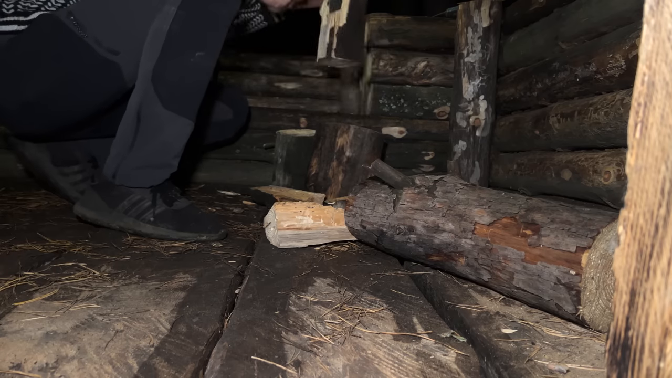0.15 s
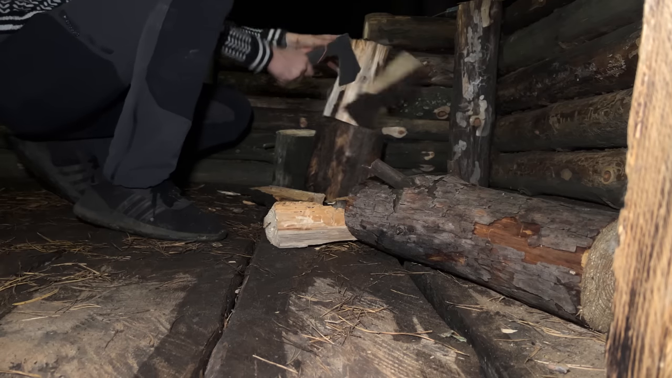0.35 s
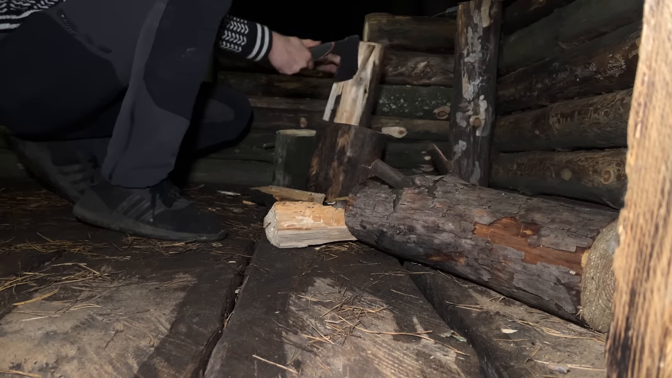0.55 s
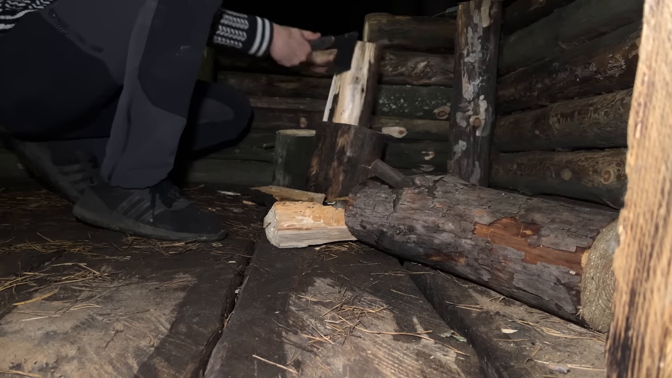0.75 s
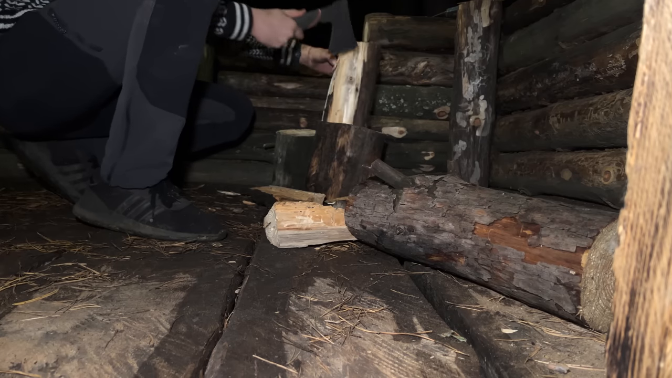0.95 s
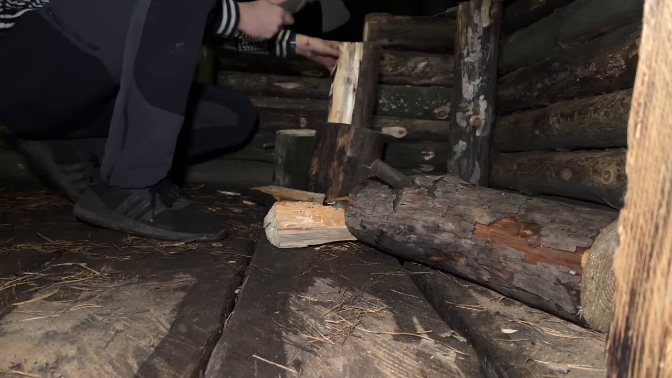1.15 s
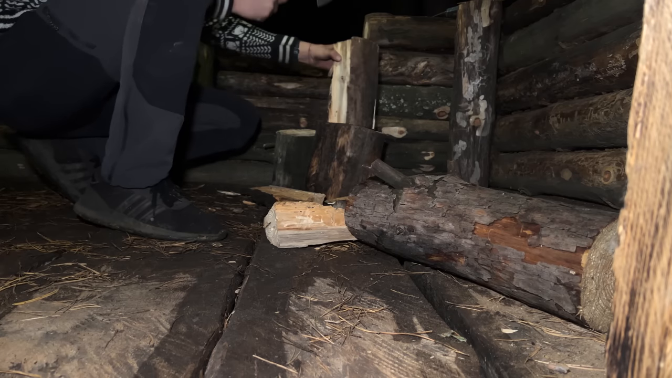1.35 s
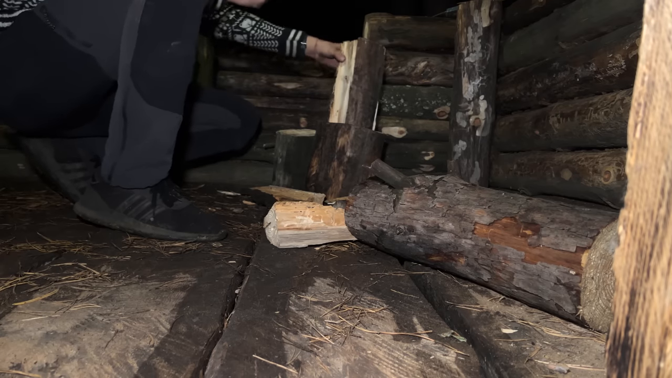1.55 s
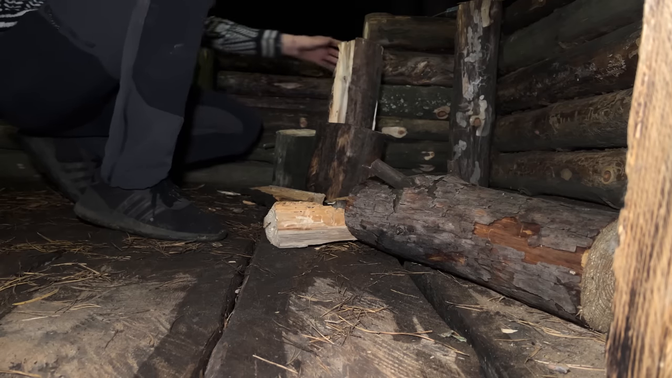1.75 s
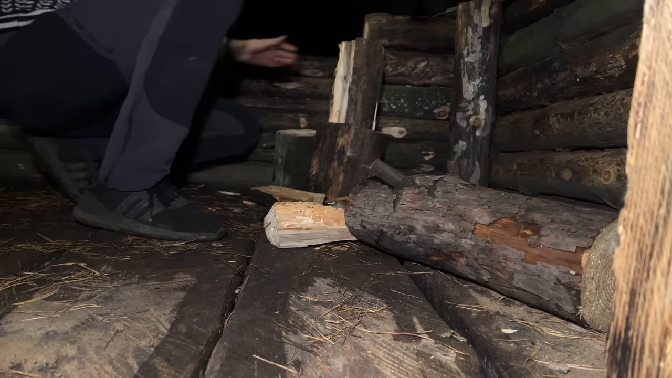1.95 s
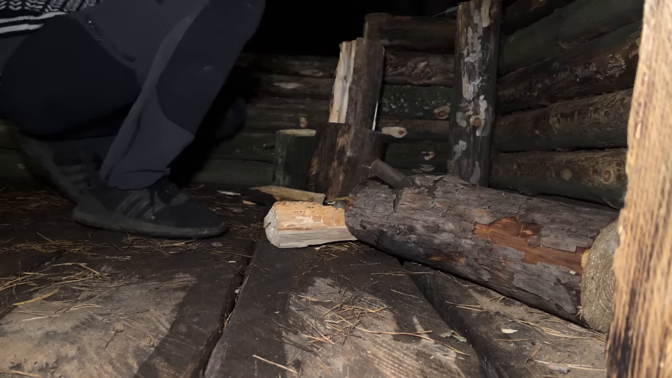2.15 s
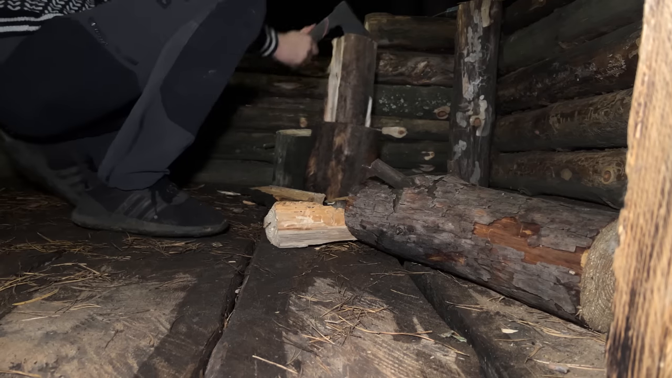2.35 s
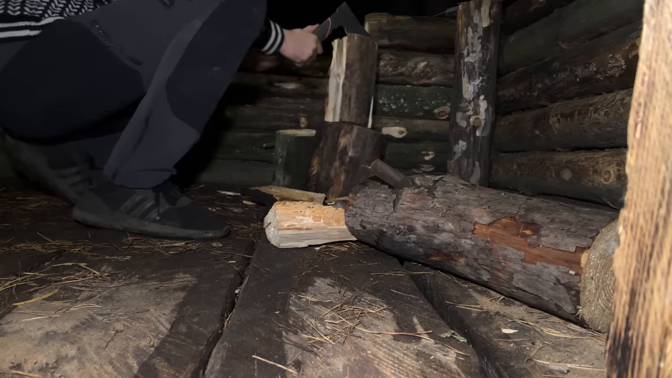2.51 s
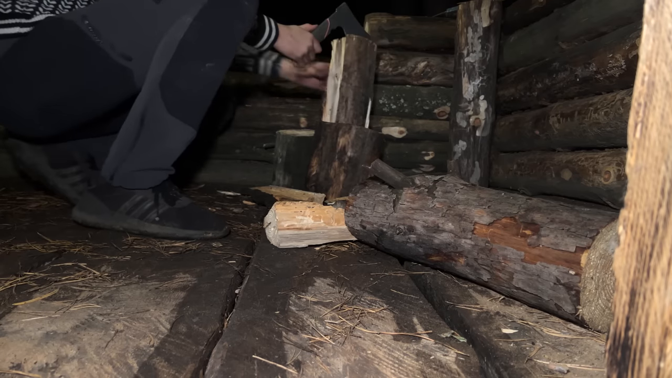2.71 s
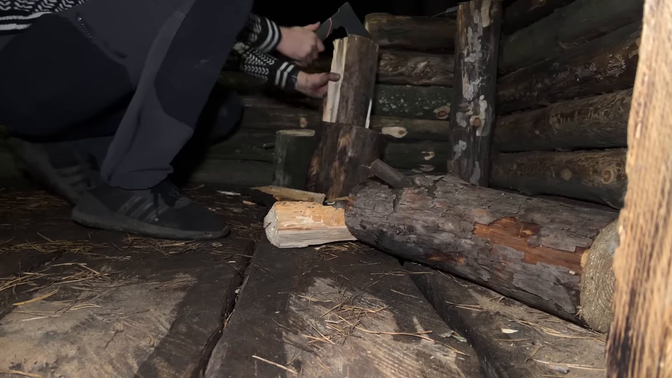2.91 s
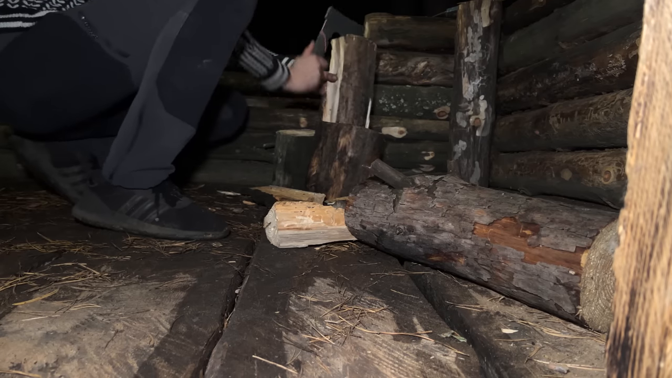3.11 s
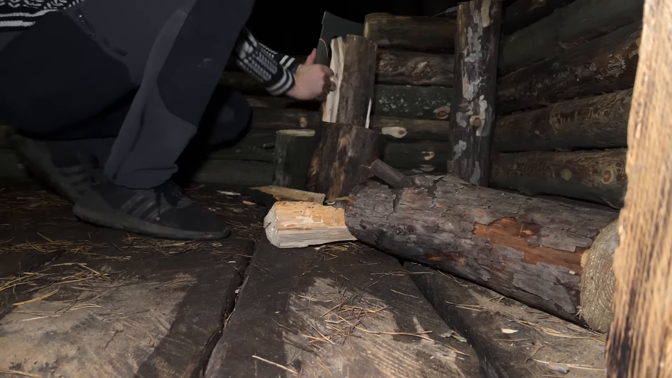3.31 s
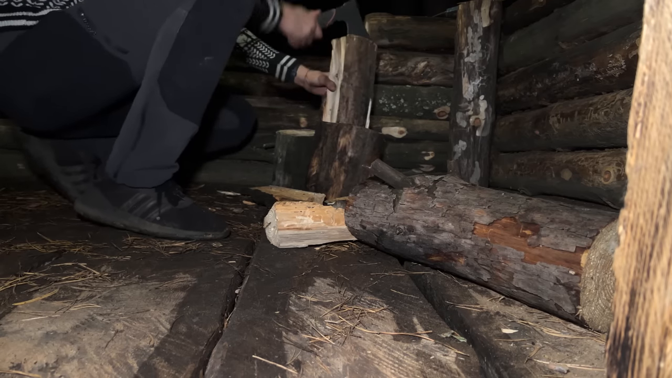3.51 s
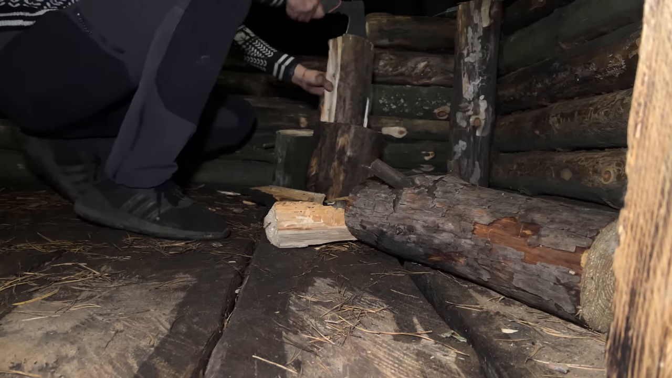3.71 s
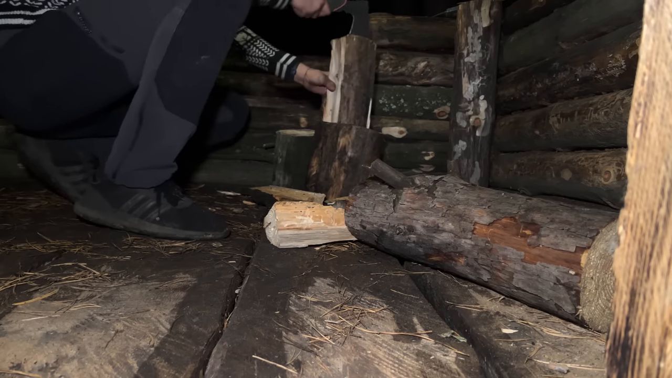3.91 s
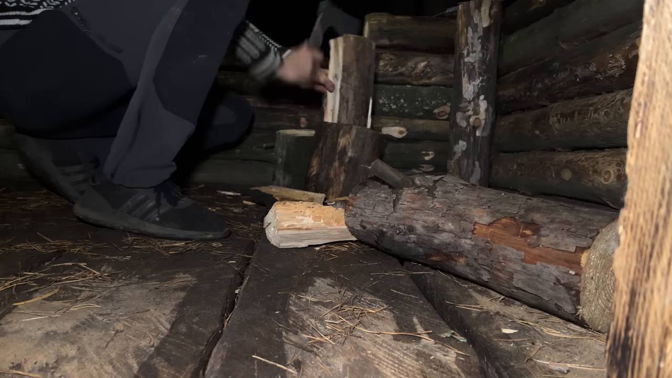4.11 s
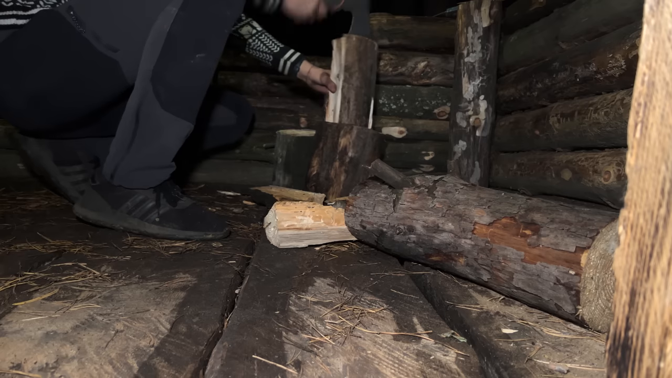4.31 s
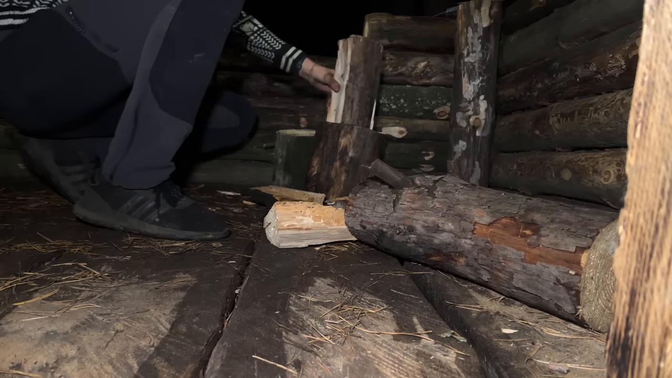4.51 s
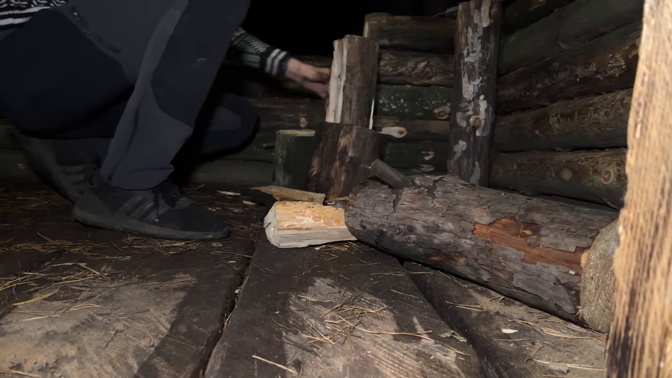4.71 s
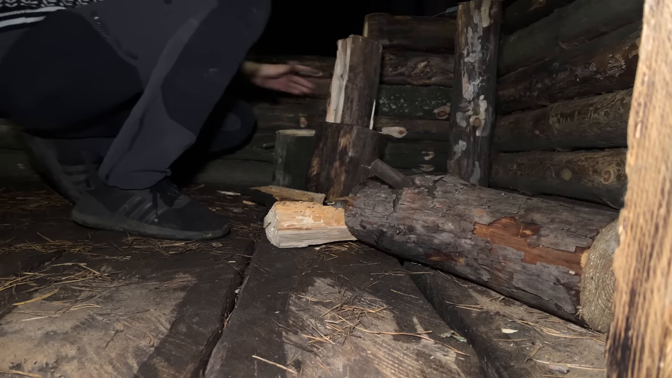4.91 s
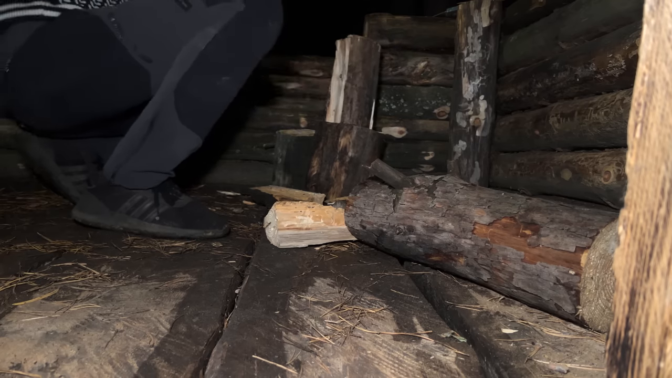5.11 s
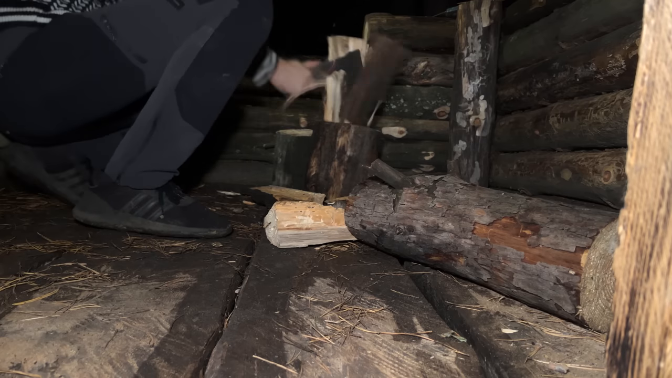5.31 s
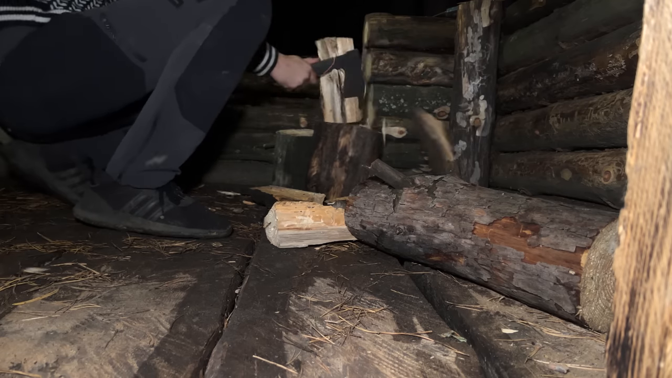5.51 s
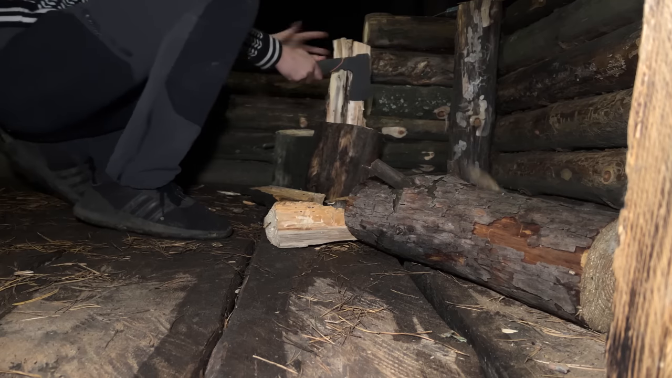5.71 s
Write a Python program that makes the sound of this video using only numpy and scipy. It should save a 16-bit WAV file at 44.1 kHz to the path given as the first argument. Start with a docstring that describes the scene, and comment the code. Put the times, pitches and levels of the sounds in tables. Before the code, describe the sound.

Close, hard hatchet blows crack a billet on a chopping block, with hollow knocks and splinter ticks between over faint outdoor air.

```python
"""A faint outdoor rumble and the rustle of sleeves and bark come first, then a hatchet splits kindling.
This happens on a chopping block in a low, open log shelter with a plank floor.
Noise bursts make the cracks; fading sine waves make the thumps of block and planks and the later knocks.
Short bands of noise make squeaks, scuffs and a sleeve swish, filtered noise the rustle and outdoor air,
and a dense noise tail stands for the sound thrown back by the log walls."""
import sys
import numpy as np
from scipy import signal
from scipy.io import wavfile

SR = 44100
rng = np.random.default_rng(int(sys.argv[2]) if len(sys.argv) > 2 else 0)


def store_pcm(level_fs):
    """Save levels as 16-bit WAV."""
    pcm = np.round(np.clip(level_fs, -1, 1) * 32767).astype(np.int16)
    wavfile.write(sys.argv[1], SR, np.atleast_2d(pcm).T)


N = 253575
TIME = np.arange(N) / SR

# outdoor air, its changing loudness: start_s, level_db
AIR_LEVELS = [(0.0, -52), (0.49, -57.5), (1.54, -63), (2.13, -68), (2.42, -51), (2.66, -57.5), (3.79, -56),
              (4.24, -51.5), (4.8, -57.5), (5.75, -41)]
# outdoor air, its tone colour: pitch_hz, level_db (per Hz, relative)
AIR_COLOUR = [(25, -34), (45, -6.5), (62, 3), (100, -9.5), (160, -18), (300, -20.5), (500, -24),
              (900, -31.5), (1800, -35.5), (3500, -43.5), (8000, -50.5), (12000, -45), (16000, -49.5)]
# sleeves and bark while the wood is handled: start_s, level_db
HANDLING_LEVELS = [(0.0, -72), (0.44, -88.5), (0.6, -74), (1.14, -74.5), (1.54, -85), (1.84, -80),
                   (1.96, -76.5), (2.35, -70), (3.02, -80.5), (3.28, -74.5), (3.53, -75.5), (3.7, -78.5),
                   (3.96, -77), (4.19, -73.5), (4.35, -73.5), (4.49, -82), (5.05, -76), (5.17, -68)]
# tone colour of that rustle: pitch_hz, level_db (per Hz, relative)
RUSTLE_COLOUR = [(250, -2), (600, 3), (1100, -8.5), (1800, 1.5), (3000, -5), (6000, -8.5), (9000, -3.5),
                 (12000, 0), (16000, -15.5)]
# how alike left and right noise are: pitch_hz, likeness (1 = the same, 0 = unrelated)
SIDE_LIKENESS = [(60, 0.99), (200, 0.95), (380, 0.83), (700, 0.073), (1400, 0.36), (15000, 0.071)]

# hatchet blows and the falls of the split-off pieces, each a crack, a thump and a rebound: start_s,
# thump_db, hardness_hz, favoured_pitch_hz, snap_db, hollow_db, brightness_db (per octave), crack_length_s,
# rebound_delay_s, rebound_thump_db, rebound_snap_db
BLOW_EVENTS = [(0.2671, -4.5, 1100, 490, -32, -16, -2.5, 0.0079, 0.019, -2.5, -38.5),
               (0.5251, -8, 515, 221, -52, -43.5, -2.5, 0.018, .016, -16.5, -44.5),
               (2.2342, 1, 725.2, 186, -15, -13.5, -5, 0.0027, .024, -17, -56.5),
               (5.2728, -7, 950, 200, -12.5, -17.5, -4.5, 0.0043, 0.023, -6, -36),
               (5.5197, 2, 590, 218, -31.5, -20, -10, 0.019, 0.028, -9, -38)]
# fibres snapping and splinters ticking as the wood is worked apart: start_s, snap_db, hollow_db,
# brightness_db (per octave), length_s
LOOSE_CRACKS = [(0.332, -63, -46, 5, 0.0027), (0.487, -76, -51, 3.5, 0.0068),
                (0.667, -46.5, -63, 3, 0.0017), (0.686, -54.5, -58.5, 2, .0023), (1.195, -54, -67, 2, .006),
                (2.151, -66, -62, -14, .0026), (2.289, -48.5, -42, -4.5, .001),
                (3.027, -56, -86, -2.5, 0.001), (3.0765, -38.5, -51, -2, 0.0051),
                (3.0904, -17.5, -28, -3, 0.00086), (3.104, -21, -40.5, -6.5, .0037),
                (3.16, -52.5, -53.5, 5, 0.00064), (3.968, -61.5, -77, -3.5, .002),
                (4.031, -60, -72, -6, 0.0017), (4.099, -59.5, -76, -4.5, 0.0032),
                (4.286, -48, -75, 1, 0.0031), (5.175, -61, -58, 2.5, 0.0016),
                (5.36, -38.5, -40.5, -1.5, 0.014), (5.3955, -19, -18, -3.5, 0.0027),
                (5.605, -46, -47.5, -4, 0.011), (5.685, -62, -70, 6, 0.0076),
                (5.708, -43.5, -43.5, -5, 0.075)]
# hollow, snap, bright and fizz parts of a crack: low_hz, high_hz
CRACK_BANDS = [(540, 1180), (1800, 3430), (3500, 9500), (9800, 15000)]
# ringing of a dry split stick: pitch_hz, level_db (relative), fade_s (time to drop 60 dB)
STICK_MODES = [(1900, -3, 0.06), (2239, -5.5, 0.058), (2950, -2, .11), (3300, -3.5, 0.051)]

# block, billet and planks ringing together: pitch_hz, level_db (relative)
BLOCK_MODES = [(56, 2), (80, 5), (102, 4), (143, 1.5), (170, -6.5), (197, -2.5), (224, -10.5), (252, -5),
               (288, -6), (322, -7), (360, -2.5), (410, -4), (478, -4), (530, -2.5), (592, -7), (680, -2.5),
               (780, 2.5), (880, -2.5), (960, -9), (1110, -7.5), (1250, -6)]
# fading of those modes, where damp wood swallows the high ones soonest: pitch_hz, fade_s (to drop 60 dB)
BLOCK_FADES = [(56, .3), (140, .2), (200, .13), (300, .1), (500, .085), (1250, .065)]
# centres of boom, thump, knock and clack: pitch_hz
REGISTER_PITCHES = [85, 180, 450, 850]
# thump, knock and clack in a hard contact: level_db (added to the contact's own)
REGISTER_LEVELS = [-7, -6.5, -12.5]

# loudness of reflections from the log walls: pitch_hz, level_db (relative)
WALL_LEVELS = [(60, -16), (200, -17.5), (400, -17), (900, -2), (2500, -4.5), (6000, 1), (12000, -14.5)]
# fading of those reflections: pitch_hz, fade_s (to drop 60 dB)
WALL_FADES = [(60, 0.29), (250, 0.13), (700, 0.072), (3000, 0.074), (12000, 0.14)]
# the billet is moved, and the walls scatter its sound in a new pattern; the last is an end: start_s
MOVE_TIMES = [0, 1.8, 2.9, 5.35, 6]

# wood bouncing, jolted or set down: start_s, level_db, hardness_hz, favoured_pitch_hz, floor_answer_db
KNOCK_EVENTS = [(0.681, -31, 254, 167, -51), (0.717, -35, 334, 230, -46), (0.733, -35, 660, 253, -57),
                (0.749, -22.5, 445, 275, -47), (0.849, -25.5, 394, 250, -38.5),
                (0.936, -38.5, 230, 172, -39.5), (1.014, -44, 229, 149, -55.5),
                (1.422, -42, 201, 125, -52.5), (2.3516, -24, 614, 177.6, -31.5),
                (2.403, -29.5, 560, 174, -19), (2.574, -27.5, 664, 185, -32.5),
                (2.978, -43, 250, 107, -46.5), (3.912, -18, 370, 181.6, -29),
                (4.039, -36, 300.5, 146, -34.5), (4.091, -29.5, 310, 163, -44.5),
                (4.211, -18, 460, 162, -20), (4.305, -27, 197, 111, -37), (4.385, -25.5, 383, 179, -27.5),
                (4.415, -15.5, 320, 144, -24), (4.467, -25.5, 242, 150, -38),
                (5.395, -22.5, 1518, 143, -35.5), (5.719, -11.5, 370, 244, -20.5)]
# rubbing strokes, from narrow wood squeaks to broad scuffs and a sleeve swish: start_s, level_db, pitch_hz,
# width_octaves, length_s
RUB_STROKES = [(0.935, -66.5, 3240, 1.4, 0.13), (2.499, -61, 1460, 0.12, 0.13),
               (2.533, -67.5, 1750, 0.49, 0.17), (2.742, -64.5, 2130, 2.4, 0.082),
               (3.397, -64, 3600, 1.5, 0.23), (3.674, -67.5, 4910, 1.8, 0.082),
               (4.016, -68.5, 3900, 2.4, 0.16), (4.251, -49, 3900, 1.04, 0.082),
               (4.617, -66.5, 4000, 2.1, 0.062), (5.129, -49.5, 6950, 8.4, .28),
               (5.487, -49, 2330, .15, 0.011), (5.575, -55, 6000, 1.3, .3), (5.709, -54, 2820, 0.13, 0.068)]
# colour of the microphone ports: pitch_hz, width_hz, gain_db
PORT_COLOURS = [(9550, 1000, -15.5), (11900, 1400, 8.5), (14300, 430, -14)]

# the block moves just after the wood starts to crack
THUMP_LAG_S = 0.0025
# a rebound is a duller thump with a bright, gritty click
REBOUND_HARD_HZ, REBOUND_PITCH_HZ = 560, 196
# the hollow part of the click is set against its snap; brightness is per octave
REBOUND_HOLLOW_DB, REBOUND_BRIGHTNESS_DB, REBOUND_LENGTH_S = 9, 1.5, 0.005
# the planks answer each knock a moment later, low and soft
FLOOR_LAG_S, FLOOR_HARD_HZ, FLOOR_PITCH_HZ = 0.012, 270, 143
# deep boom against the thump, for a contact on the block and on the floor
BLOCK_BOOM_DB, FLOOR_BOOM_DB = -23.5, -15
LOW_CUT_HZ, HIGH_CUT_HZ = 12, 16100


def from_db(db):
    """Turn decibels into a plain multiplier."""
    return 10 ** (np.asarray(db) / 20)


def rms_one(x):
    """Scale a sound so that its average strength (rms) is 1."""
    return x / np.sqrt(np.mean(x ** 2) + 1e-20)


def in_time(rows):
    """Join (time, value) points by straight lines, one value per sample."""
    return np.interp(TIME, *np.transpose(rows))


def at_hz(points, hz):
    """Read a (pitch, value) curve, with octaves evenly spaced as the ear hears them."""
    freqs, values = np.transpose(points)
    return np.interp(np.log(hz), np.log(freqs), values)


def add(track, start_s, sound):
    """Mix a sound into a track, cutting off what runs past the end."""
    start = max(round(start_s * SR), 0)
    part = sound[..., :max(N - start, 0)]
    track[..., start:start + part.shape[-1]] += part


def band(x, low_hz, high_hz):
    """Keep only the pitches between two limits."""
    limits = [low_hz, min(high_hz, 0.45 * SR)]
    sos = signal.butter(2, limits, "band", fs=SR, output="sos")
    return signal.sosfilt(sos, x + 1e-18)


def drift(rate):
    """Wander between random values, with `rate` new values per second."""
    knots = rng.standard_normal(2000)
    return np.interp(TIME * rate, np.arange(len(knots)), knots)


def stereo_bands(size):
    """Give half-octave bands of noise (centre Hz, noise), nearly alike left and right in the bass."""
    edges = 22 * 2 ** np.arange(0, 10, 0.5)
    white = rng.standard_normal((2, 2, size))
    for k, (low, high) in enumerate(zip(edges, edges[1:])):
        mid, side = band(white[k % 2], low, high)   # neighbouring bands use separate noise
        hz = np.sqrt(low * high)
        alike = np.clip(at_hz(SIDE_LIKENESS, hz), -1, 1)
        shared = np.sqrt((1 + alike) / 2) * mid
        opposed = np.sqrt((1 - alike) / 2) * side * [[1], [-1]]
        yield hz, shared + opposed


def noise(colour, patchy_db, rate):
    """Make coloured stereo noise of rms 1 whose bands flicker independently."""
    total = 0
    for hz, x in stereo_bands(N):
        level_db = at_hz(colour, hz) + patchy_db * drift(rate)
        total = total + from_db(level_db) * x
    return rms_one(total)


def outdoor_air():
    """Outdoor air is a low, flickering noise that slowly swells and sinks."""
    return from_db(in_time(AIR_LEVELS)) * noise(AIR_COLOUR, patchy_db=4.0, rate=20.0)


def handling(scratch_db=1.5, scratch_rate=120, crumbs_per_s=61.0, crumb_db=-10.0):
    """Cloth and bark rub in small, uneven catches; crumbs of bark tick in between."""
    catches = from_db(scratch_db * drift(scratch_rate))
    rub = catches * noise(RUSTLE_COLOUR, patchy_db=-0.5, rate=2.1)
    ticks = (rng.random(N) < crumbs_per_s / SR) * rng.standard_normal((2, N))
    crumbs = band(ticks, 1800, 12000)
    crumbs_in_shelter = rms_one(crumbs + shelter(crumbs))
    return from_db(in_time(HANDLING_LEVELS)) * (rub + from_db(crumb_db) * crumbs_in_shelter)


def blows():
    """The wood cracks, the block thumps, and the piece comes down once more: (contacts, snaps)."""
    contacts, snaps = [], []
    for (start_s, thump_db, hard_hz, pitch_hz, snap_db, hollow_db, brightness_db, length_s,
         delay_s, rebound_db, click_db) in BLOW_EVENTS:
        thump_s = start_s + THUMP_LAG_S
        contacts += [(thump_s, thump_db, hard_hz, pitch_hz, BLOCK_BOOM_DB),
                     (thump_s + delay_s, rebound_db, REBOUND_HARD_HZ, REBOUND_PITCH_HZ, BLOCK_BOOM_DB)]
        snaps += [(start_s, snap_db, hollow_db, brightness_db, length_s),
                  (start_s + delay_s, click_db, click_db + REBOUND_HOLLOW_DB,
                   REBOUND_BRIGHTNESS_DB, REBOUND_LENGTH_S)]
    return contacts, snaps


def cracks(snaps, hold_s=0.0072, grain_db=3.5, rise_s=0.00015, splinter_db=-29.5, splinter_s=0.016,
           width=0.7):
    """Wood fibres part in a sudden noise burst; a weaker, grainier tail of splinters follows."""
    out = np.zeros((2, N))
    t = np.arange(SR // 8) / SR
    centres = np.log2(CRACK_BANDS).mean(axis=1)   # in octaves
    for start_s, snap_db, hollow_db, brightness_db, length_s in snaps:
        upper_db = snap_db + brightness_db * (centres[1:] - centres[1])
        levels = [hollow_db, *upper_db]
        burst = (1 - np.exp(-t / rise_s)) * np.exp(-t / max(length_s, 1e-4))
        fibres = np.repeat(rng.standard_normal(len(t)), 12)[:len(t)]   # each grain lasts 12 samples
        splinters = from_db(splinter_db + grain_db * fibres) * np.exp(-t / splinter_s)
        force = burst * from_db(grain_db * fibres / 2) + splinters
        for level, (low, high) in zip(levels, CRACK_BANDS):
            rough = band(force * rng.standard_normal((2, len(t))), low, high)
            mid, side = rms_one(band(rough, low / 2, high * 2.3))
            snap = rms_one(rms_one(mid) + width * rms_one(side) * np.array([[1], [-1]]))
            # as much energy as a sound of that level held for hold_s
            add(out, start_s, from_db(level) * snap * np.sqrt(hold_s / t[-1]))
    return out


def stick(x, ring_db=-55.5):
    """Each crack sets the split wood ringing briefly, as fading tones from resonant filters."""
    out = 0
    for hz, mode_db, fade_s in STICK_MODES:
        shrink = from_db(-60 / (fade_s * SR))   # loss per sample
        turn = 2 * np.pi * hz / SR              # swing angle per sample
        feedback = [1, -2 * shrink * np.cos(turn), shrink * shrink]
        ring = signal.lfilter([0, np.sin(turn)], feedback, x + 1e-18)
        out = out + from_db(ring_db + mode_db) * ring
    return out


def shelter(x, build_s=0.0015, outside_db=-33.5, outside_fade_s=0.69):
    """Round logs scatter a dense, short tail; a faint, longer one returns from outdoors."""
    t = np.arange(SR) / SR
    response = 0
    for hz, scatter in stereo_bands(SR):
        near = (1 - np.exp(-(t / build_s) ** 2)) * from_db(-60 * t / at_hz(WALL_FADES, hz))
        far = (1 - np.exp(-t / 0.056)) * from_db(-60 * t / outside_fade_s)
        tail = near / np.linalg.norm(near) + from_db(outside_db) * far / np.linalg.norm(far)
        response = response + from_db(at_hz(WALL_LEVELS, hz)) * tail * scatter
    return signal.fftconvolve(x, response, axes=1)[:, :N]


def thuds(contacts, softness_slope=8.8, favour_db=11.5, favour_octaves=0.33, spot_db=3.5, detune=0.021,
          swell_cycles=0.41, scatter_rad=0.88, width_rad=0.07, press_s=0.016, free_db=-5.0,
          low_cut_hz=54.0):
    """Each contact (s, dB, hardness Hz, pitch Hz, boom dB) rings the modes by its hardness and spot."""
    out = np.zeros((2, N))
    t = np.arange(SR // 5) / SR
    hz, mode_db = np.transpose(BLOCK_MODES)[:, :, None]
    thump_hz = REGISTER_PITCHES[1]
    # the first few swings are strong, then most energy has leaked into the ground; deep modes hold on longer
    free = from_db(free_db)
    leak = free + (1 - free) * np.exp(-(t / press_s) ** 2 * np.minimum(hz / thump_hz, 1) ** 2)
    fade = leak * from_db(-60 * t / at_hz(BLOCK_FADES, hz))
    chances = rng.standard_normal((len(contacts), 4, len(BLOCK_MODES), 1))
    for (start_s, db, hard_hz, pitch_hz, boom_db), chance in zip(contacts, chances):
        levels = db + np.array([boom_db, *REGISTER_LEVELS])
        register_db = np.interp(np.log(hz), np.log(REGISTER_PITCHES), levels)
        contact = 1 / (1 + (hz / hard_hz) ** softness_slope)   # a soft contact cannot reach the high modes
        favour = favour_db * np.exp(-(np.log2(hz / pitch_hz) / favour_octaves) ** 2)
        strength = contact * from_db(register_db + mode_db + favour + spot_db * chance[0])
        cycles = hz * (1 + detune * chance[1]) * t
        swell = 1 - np.exp(-(cycles / swell_cycles) ** 2)   # heavy, low parts take longer to get moving
        apart = width_rad * np.sqrt(hz / thump_hz) * chance[3]   # short waves reach the sides out of step
        phase = 2 * np.pi * cycles + scatter_rad * chance[2] + np.array([apart, -apart])
        ringing = strength * swell * fade * np.sin(phase)
        add(out, start_s, np.sum(ringing, axis=1))
    return band(out, low_cut_hz, 2500)


def knocks():
    """Wood makes a light contact, then the planks answer: list both as contacts."""
    contacts = []
    for start_s, level_db, hard_hz, pitch_hz, floor_db in KNOCK_EVENTS:
        contacts += [(start_s, level_db, hard_hz, pitch_hz, BLOCK_BOOM_DB),
                     (start_s + FLOOR_LAG_S, floor_db, FLOOR_HARD_HZ, FLOOR_PITCH_HZ, FLOOR_BOOM_DB)]
    return contacts


def rubs(scratch_db=3.5, scratch_rate=250):
    """Wood squeaks, scuffs and a sleeve swish: a rough noise band swells and fades with each stroke."""
    out = np.zeros((2, N))
    for start_s, level_db, hz, octaves, length_s in RUB_STROKES:
        size = int(length_s * SR)
        half_width = 2 ** (octaves / 2)
        stroke = band(rng.standard_normal((2, size)), hz / half_width, hz * half_width)
        add(out, start_s, from_db(level_db) * rms_one(stroke) * np.hanning(size))
    return out * from_db(scratch_db * drift(scratch_rate))


def scene():
    """Lay the wood and its reflections over rubbing, rustle and outdoor air."""
    air = outdoor_air()
    rustle = handling()
    strikes, splits = blows()
    splitting = cracks(splits + list(LOOSE_CRACKS))
    thumps = thuds(strikes + knocks()) * from_db([[0.3], [-0.3]])   # a touch louder on the left
    wood = thumps + splitting + stick(splitting)
    walls = 0
    for start, end in zip(MOVE_TIMES, MOVE_TIMES[1:]):
        walls = walls + shelter(wood * (TIME >= start) * (TIME < end))
    return wood + walls + rubs() + rustle + air


def record(dry):
    """The microphone ports colour the treble, the loudest peaks overload, deep bass and top treble are cut."""
    x = signal.sosfilt(signal.butter(3, LOW_CUT_HZ, "high", fs=SR, output="sos"), dry)
    for hz, width_hz, gain_db in PORT_COLOURS:
        turn = 2 * np.pi * hz / SR
        gain = from_db(gain_db / 2)   # half above and half below the line of the filter
        spread = np.sin(np.pi * width_hz / SR)
        middle = -2 * np.cos(turn)
        x = signal.lfilter([1 + spread * gain, middle, 1 - spread * gain],
                           [1 + spread / gain, middle, 1 - spread / gain], x)
    x = x / (1 + x ** 8) ** (1 / 8)   # rounds peaks off towards full scale
    return signal.sosfilt(signal.ellip(8, 0.2, 70, HIGH_CUT_HZ, fs=SR, output="sos"), x)


dry = scene()
out = record(dry)
store_pcm(out)
```